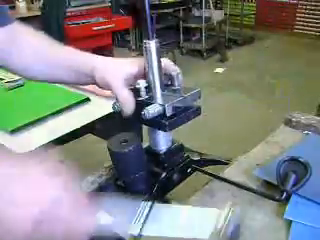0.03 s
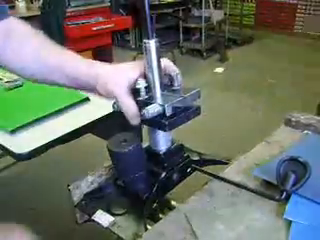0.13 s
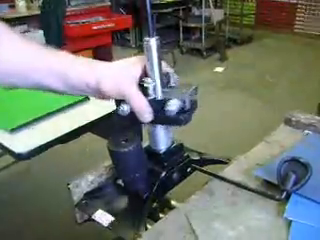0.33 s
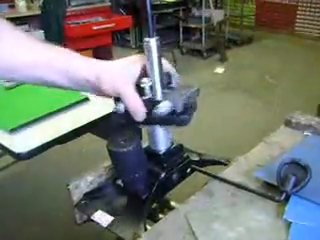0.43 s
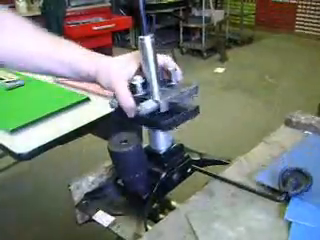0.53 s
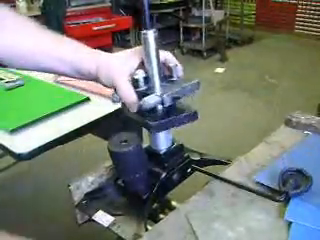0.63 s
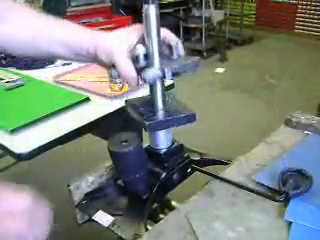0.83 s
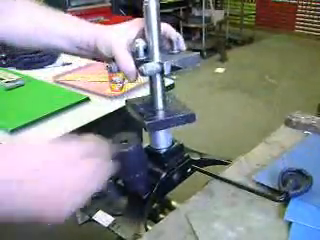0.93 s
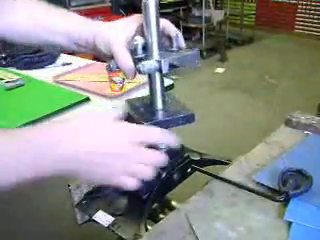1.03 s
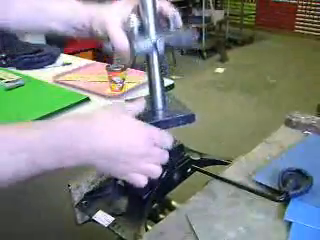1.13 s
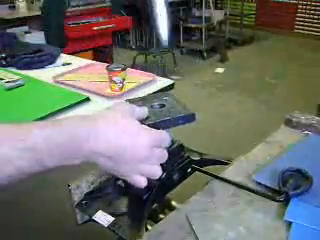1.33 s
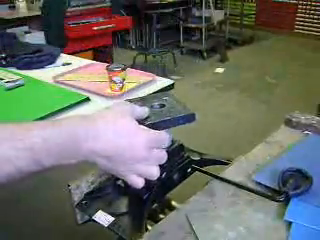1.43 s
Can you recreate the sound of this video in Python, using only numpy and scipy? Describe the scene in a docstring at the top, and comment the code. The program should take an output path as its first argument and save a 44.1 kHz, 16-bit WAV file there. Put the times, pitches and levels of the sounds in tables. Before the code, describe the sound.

Steel knocks and clatters close to the microphone over a steady workshop ventilation hum. After a faint tick, a clamp block rattles and grinds on its post at about 0.2 seconds, loud and slightly distorted. A rod clinks twice around 0.35. A second burst of knocks with a small ping runs from 0.4 to 0.65 seconds. A soft, low sliding rub follows until 0.85, then only the hum remains.

```python
"""A workshop bench, small microphone close to a steel fixture, ventilation humming throughout.
A steel rod ticks faintly, then a clamp block is forced: it knocks, chatters and grinds on its post,
ringing the fixture. The rod clinks twice. A second burst of knocks opens with the ping of a jarred
fitting, and the freed block slides up the post with a low rub. The loud knocks overload the microphone."""
import sys
import numpy as np
from scipy import signal
from scipy.fft import rfft, irfft
from scipy.io import wavfile
from scipy.ndimage import uniform_filter1d

SR = 44100
rng = np.random.default_rng(int(sys.argv[2]) if len(sys.argv) > 2 else 0)


def inscribe(sig):
    """Save sig as 16-bit PCM at rate SR to the path in sys.argv[1].

    A 1-D sig is mono; a 2-D sig holds one channel per row.
    Samples are clipped to [-1, 1] before scaling.
    """
    pcm = np.round(np.clip(np.atleast_2d(sig).T, -1, 1) * 32767)
    wavfile.write(sys.argv[1], SR, pcm.astype(np.int16))


N = 66150  # 1.5 s


def amp(db):
    """Decibels to gain."""
    return 10 ** (np.asarray(db) / 20)


def unit(x):
    """Scales to rms 1."""
    return x / np.sqrt(np.mean(x ** 2) + 1e-20)


def read(points, hz):
    """Reads a table on a log-frequency axis."""
    f, value = np.transpose(points)
    return np.interp(np.log(hz + 1), np.log(f + 1), value)


def add(mix, start_s, sound):
    """Mixes a sound in at the given time."""
    part = mix[max(round(start_s * SR), 0):][:len(sound)]
    part += sound[:len(part)]


def noise(spectrum, size):
    """Noise of rms 1 whose spectral density has the given shape."""
    gain = amp(read(spectrum, np.fft.rfftfreq(size, 1 / SR)))
    return unit(irfft(rfft(rng.standard_normal(size)) * gain, size))


def fade(t, t60):
    """Exponential decay by 60 dB in t60 seconds."""
    return np.exp(-np.log(1000) * t / t60)


def burst(spectrum, t60, size=12000):
    """A dense cluster of modes, struck and dying together."""
    return noise(spectrum, size) * fade(np.arange(size) / SR, t60)


def ring(modes, spread_db, t60_scale=1, size=12000):
    """One strike on a set of modes; each blow lands elsewhere, so signs and weights are random."""
    hz, db, t60 = np.transpose(modes)[:, :, None]
    t = np.arange(size) / SR
    weight = rng.choice([-1, 1], hz.shape) * amp(db + spread_db * rng.standard_normal(hz.shape))
    return (weight * fade(t, t60 * t60_scale) * np.sin(2 * np.pi * hz * t)).sum(0)


def colour(x, response, size=2048):
    """Minimum-phase filter with the given response."""
    log_gain = np.log(amp(read(response, abs(np.fft.fftfreq(size, 1 / SR)))))
    taps = np.fft.ifft(np.exp(np.conj(signal.hilbert(log_gain)))).real
    return signal.fftconvolve(x, taps[:size // 2])[:N]


def saturate(x, knee=4.2):
    """Rounds off at plus and minus one."""
    return x / (1 + abs(x) ** knee) ** (1 / knee)


def ventilation():
    """Room tone: slightly patchy air noise with a few wavering fan tones."""
    # moving air: f/Hz, level/dB
    air_spectrum = [(25, -8), (50, -29), (80, -20.5), (115, -12.5), (160, -6), (215, -4), (330, -1),
                    (430, -4.5), (650, 0), (880, -1.5), (1040, 2), (1450, -12), (2200, -14.5),
                    (3200, -15.5), (4200, -14.5), (5000, -19.5), (6000, -28), (8000, -23.5), (9700, -28),
                    (12500, -27)]
    # fan tones: f/Hz, level/dB, width/Hz
    fan_tones = [(77.2, -52, 3), (156, -44.5, 2.9), (333.8, -43.5, 24), (981, -40, 14), (1093, -44, 12)]
    cells = signal.stft(noise(air_spectrum, N), nperseg=1024, noverlap=768)[2]
    patches = uniform_filter1d(rng.standard_normal(cells.shape), size=8, axis=0)
    patch_db = unit(uniform_filter1d(patches, size=12, axis=1))  # 1 dB rms over frequency and time
    air = signal.istft(cells * amp(patch_db), nperseg=1024, noverlap=768)[1][:N]
    f = np.fft.rfftfreq(N, 1 / SR)
    hum = np.zeros(N)
    for hz, db, width in fan_tones:
        band = np.exp(-2 * ((f - hz) / width) ** 2)
        hum += amp(db) * unit(irfft(rfft(rng.standard_normal(N)) * band, N))
    return amp(-29) * unit(air) + hum


def workshop(x):
    """Quick reflections from bench and floor, then a faint tail that is longest in the bass."""
    # decay of the room: f/Hz, t60/s
    room_decay = [(60, 0.77), (250, 1), (1000, 0.62), (4000, 0.29), (12000, 0.62)]
    hz, t, cells = signal.stft(rng.standard_normal(SR), SR, nperseg=256)
    tail = signal.istft(cells * fade(t, read(room_decay, hz)[:, None]), SR, nperseg=256)[1][:SR]
    early = rng.standard_normal(SR) * fade(np.arange(SR) / SR, t60=0.083)
    echo = amp(-22.5) * tail / np.linalg.norm(tail) + amp(-15) * early / np.linalg.norm(early)
    return signal.fftconvolve(x, echo)[:N]


def slide():
    """The freed block rubs softly as it is drawn up the post."""
    # swell of the rub: t/s, level/dB
    swell = [(.62, -87), (.675, -35), (.77, -30.5), (.83, -43), (.9, -82)]
    # low rub of block on post: f/Hz, level/dB
    rub_spectrum = [(30, -28), (60, -22), (78, 11.5), (110, -23), (155, 11), (210, -6), (500, 0.5),
                    (1100, -15), (1600, -31), (6000, -31), (12000, -48)]
    level_db = np.interp(np.arange(N) / SR, *np.transpose(swell))
    return noise(rub_spectrum, N) * amp(level_db)


def fitting():
    """A small steel fitting, jarred once, pings at the start of the second burst."""
    # modes of the fitting: f/Hz, level/dB, t60/s
    modes = [(2410, -7, 0.056), (3260, -6, 0.045), (5227, 1, 0.063), (5810, -3, 0.058)]
    out = np.zeros(N)
    add(out, start_s=0.429, sound=amp(-4.5) * ring(modes, spread_db=1.5))
    return out


def rod():
    """Light touches on the steel rod give a bright short ring, a tick and a small clank."""
    # touches: t/s, ring level/dB, tick level/dB, clank level/dB
    touches = [(.0535, -23, -12, -36), (.0795, -53, -22, -42), (.3494, -1, -5, -7.5),
               (.3740, -11.5, -19, -13.5)]
    # modes of the rod: f/Hz, level/dB, t60/s
    modes = [(1610, -18, 0.19), (2050, -20, 0.22), (3330, -11, 0.14), (3607, 1, 0.11), (3665, -2, 0.27),
             (7700, -8, 0.11), (11410, -23, .07)]
    # quickly damped tick: f/Hz, level/dB
    tick_spectrum = [(300, -35), (2600, -37), (3500, 2.5), (4200, 2.5), (4900, -8), (6200, -17),
                     (8000, -12), (9500, -20), (12000, -13)]
    # duller clank: f/Hz, level/dB
    clank_spectrum = [(200, -15), (900, 2), (1300, -20), (1750, 3.5), (2300, -9), (3200, -6.5), (4500, -6),
                      (6000, -25), (12000, -18)]
    out = np.zeros(N)
    for start_s, ring_db, tick_db, clank_db in touches:
        ringing = amp(ring_db - 15.5) * ring(modes, spread_db=1.5)
        tick = amp(tick_db - 7.5) * burst(tick_spectrum, t60=0.032)
        clank = amp(clank_db - 10.5) * burst(clank_spectrum, t60=0.16)
        add(out, start_s, ringing + tick + clank)
    return out


def grind(slips_per_s=900, size=8192):
    """The forced block grinds on its post: dense random slips of steel, swelling and fading."""
    # spells of grinding: t/s, length/s, level/dB
    spells = [(.229, 0.044, -17), (0.436, 0.035, -17.5), (.490, .022, -22), (.531, 0.025, -26)]
    # one slip: f/Hz, level/dB
    slip_spectrum = [(200, -16), (1000, -7), (2000, -14), (3000, -16), (3700, 3), (4300, 2), (5100, -11),
                     (6400, -19), (13000, -20)]
    out = np.zeros(N)
    t = np.arange(size) / SR
    for start_s, length_s, db in spells:
        slipping = rng.random(size) < slips_per_s / SR
        impulses = slipping * rng.standard_normal(size)
        slips = signal.fftconvolve(impulses, burst(slip_spectrum, t60=0.012))[:size]
        progress = np.minimum(t / length_s, 1)
        arch = np.sqrt(np.sin(np.pi * progress).clip(0))
        add(out, start_s, amp(db) * arch * unit(slips))
    return out


def clamp():
    """Each knock cracks at the block's edge and rings fixture and stand; the hand damps some sooner."""
    # block against fixture: t/s, blow level/dB, click level/dB, factor on the ring time
    knocks = [(0.2258, 13.5, -14, 1.05), (0.2338, -11, 9.5, 0.46), (0.2372, 4.5, 0, 0.57),
              (.2478, 12.5, 15, 0.56), (.2545, 9, -21, 0.31), (.2600, -2, 0.5, 0.9),
              (0.2637, -6.5, 9, 0.63), (.2710, -29, -2.5, 0.61), (0.2758, -15, -9.5, 0.38),
              (0.2928, -2, -3, 0.77), (0.3059, -10.5, -7.5, .5), (0.3263, -21, -27, 2.2),
              (0.4254, 10.5, -8, .9), (.4330, 0, -4, 1.97), (.4440, 9.5, -6, 1.31), (.4530, 3.5, 3, 0.62),
              (.4580, -1, 2, .9), (0.4699, 2, 10, 0.82), (0.4807, -12, -9, 0.43), (0.503, -10, -18, 0.9),
              (0.5119, 4, -6, 0.48), (.5292, 2, 4, 0.99), (0.5388, 1.5, 9, 0.87), (0.5451, 5.5, 9, .8),
              (.5528, -6.5, 7, 0.86), (.5560, 3.5, -18, 0.93), (.5765, -13.5, -29, 0.83),
              (.5848, -2.5, -23, 0.7), (.5890, 2, -3, 0.61), (.6080, 0.5, 11, 0.64), (0.6123, 5, 3.5, .7),
              (.6355, -29, -19, 0.24), (.6450, -5.5, -11, 0.47)]
    # modes of the fixture: f/Hz, level/dB, t60/s
    fixture_modes = [(255.7, -19, 0.11), (314, -15, 0.071), (458.4, -13.5, 0.1), (595, -10, 0.11),
                     (648, -13, 0.077), (714.6, -11, 0.11), (785.2, -1, 0.063), (831.5, -10.5, 0.14),
                     (880.7, 0.5, 0.06), (943.7, -0.5, 0.053), (1004.3, -12, 0.098), (1162, -13, 0.088),
                     (1336, -9.5, 0.059), (1548, -8.5, 0.042), (3030, -31, 0.042)]
    # dense, quickly damped ring of the stand: f/Hz, level/dB
    stand_spectrum = [(30, -45), (100, -35), (250, -16.5), (500, -8), (850, -6.5), (1400, -1), (2200, -19),
                      (4000, -46), (6000, -29), (13000, -25.5)]
    # steel edge on steel: f/Hz, level/dB
    edge_spectrum = [(200, -22), (1000, 6), (2000, -3.5), (3000, -4), (3600, 1.5), (4200, 2.5), (5000, -10),
                     (6200, -13), (8000, -9), (13000, -20)]
    out = np.zeros(N)
    push_s = 0.00029  # one sharp push of the blow itself in the first instant of each knock
    push_age = np.arange(600) / SR / push_s
    blow_push = amp(3.5) * np.sin(np.pi * push_age / 2) * np.exp(-push_age / 2)
    for start_s, blow_db, click_db, t60_scale in knocks:
        fixture = amp(-5) * ring(fixture_modes, spread_db=4, t60_scale=t60_scale)
        stand = amp(-4.5) * burst(stand_spectrum, t60=0.051 * t60_scale)
        crack = amp(-0.5) * burst(edge_spectrum, t60=0.0056)
        click = amp(-4.5) * burst(edge_spectrum, t60=0.018)
        add(out, start_s, amp(blow_db) * (fixture + stand) + amp(click_db) * (crack + click))
        add(out, start_s, amp(blow_db) * blow_push)
    return out


def scene():
    """The steel parts close up, with the workshop and its ventilation behind them, in mono."""
    metal = clamp() + grind() + rod() + fitting() + slide()
    return (metal + workshop(metal) + ventilation())[None]


def record(dry):
    """The microphone overloads a little unevenly; the recorder dulls the treble and cuts off its top."""
    # recorder response after the overload: f/Hz, level/dB
    response = [(20, -4.5), (70, 0.5), (1000, -1.5), (4300, -1), (5500, -8.5), (7000, -11), (10000, -15.5),
                (12500, -13.5)]
    ceiling, bias, cutoff_hz = 0.75, 0.064, 12700
    clipped = ceiling * (saturate(dry[0] / ceiling + bias) - saturate(bias))
    low_pass = signal.firwin(511, cutoff_hz, window=("kaiser", 9), fs=SR)
    return signal.fftconvolve(colour(clipped, response), low_pass, "same")[None]


dry = scene()
out = record(dry)
inscribe(out)
```